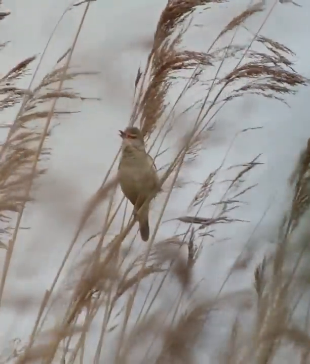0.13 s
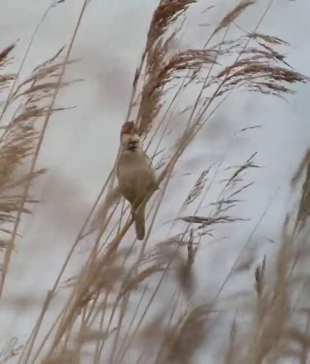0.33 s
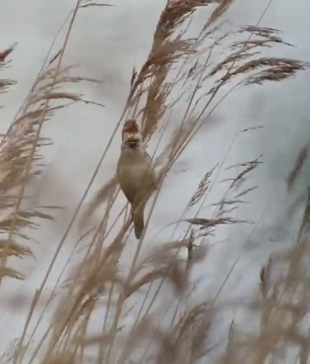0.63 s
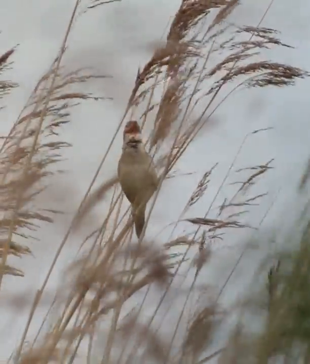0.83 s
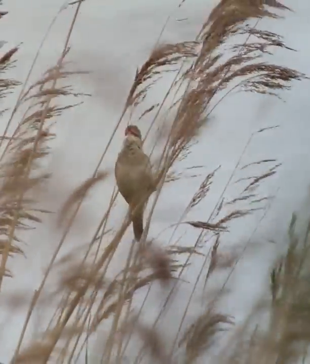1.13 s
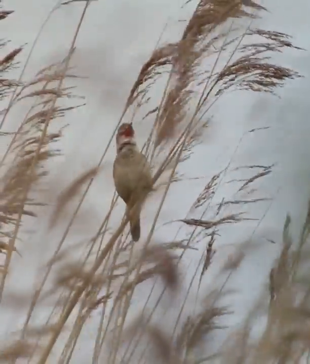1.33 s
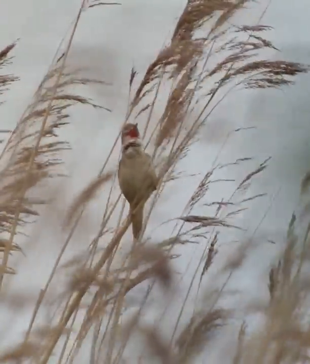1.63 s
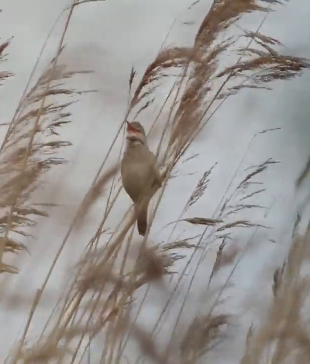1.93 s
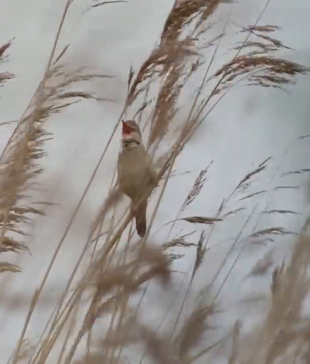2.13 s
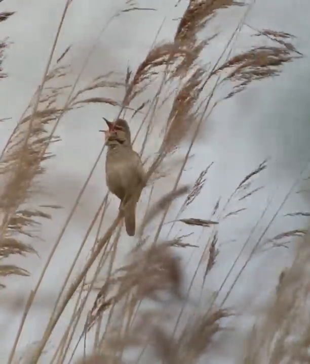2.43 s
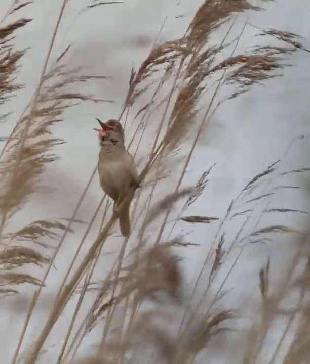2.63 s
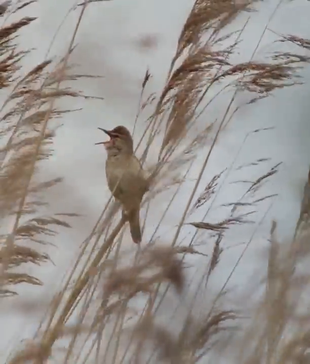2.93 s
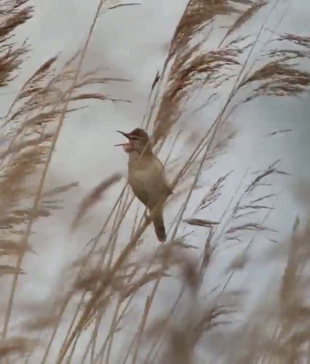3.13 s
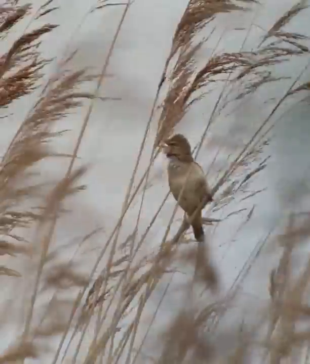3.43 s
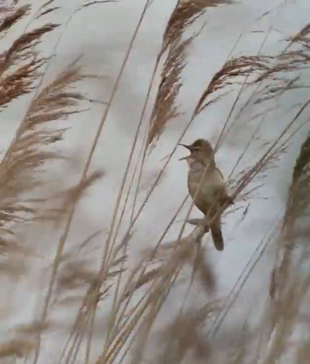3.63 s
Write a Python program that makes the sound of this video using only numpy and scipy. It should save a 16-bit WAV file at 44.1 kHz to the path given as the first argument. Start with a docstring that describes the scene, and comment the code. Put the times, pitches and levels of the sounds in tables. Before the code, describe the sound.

A warbler sings from reeds: quick falling yaps, a squeal, four rasping churrs, paired chacks, then rising slides into trills. Other birds whistle and pip. Distant stereo microphones, song to the left, soft wind rumble.

```python
"""A warbler sings harsh rhythmic phrases in a reed bed, left of distant microphones: nasal overtone stacks,
rasping pulses that ring the throat, fast trills and falling yaps, all tones and filtered pulses.
Other small birds whistle, buzz, seep and pip around it; reeds and bank scatter echoes as random taps.
Shaped noise makes the wind's rumble on the microphones, the hiss of the reeds, dull knocks and a stem tick."""
import sys
import numpy as np
from scipy import signal
from scipy.fft import rfft, irfft
from scipy.io import wavfile
from scipy.ndimage import uniform_filter1d

SR = 44100
rng = np.random.default_rng(int(sys.argv[2]) if len(sys.argv) > 2 else 0)


def makeup_ratio(level_db):
    """Linear amplitude ratio for a level in decibels (20 dB per factor of ten)."""
    decades = np.asarray(level_db, float) / 20
    return 10 ** decades


def wav_out(sig):
    """Save sig, one row per channel (or a flat mono array), as 16-bit PCM at SR to the path in sys.argv[1]."""
    wavfile.write(sys.argv[1], SR, np.round(np.clip(np.atleast_2d(sig).T, -1, 1) * 32767).astype(np.int16))


N = 166257

SINGER_PAN_DB, OTHERS_PAN_DB = 9, 9.5  # left over right
ATTACK_S, RELEASE_S = 0.0022, 0.004
THROB_JITTER = 0.06  # share of the throb rate


def evened(x):
    """Scales to an rms of 1."""
    return x / np.sqrt(np.mean(x ** 2) + 1e-20)


def read(points, hz):
    """Interpolates a curve along log frequency."""
    point_hz, value = np.transpose(points)
    return np.interp(np.log(hz + 1), np.log(point_hz + 1), value)


def add(mix, start_s, sound, pan_db):
    """Adds a mono sound, its level split between the sides; positive pan is left."""
    part = mix[:, round(start_s * SR):][:, :len(sound)]
    part += sound[:part.shape[1]] * makeup_ratio(np.array([[pan_db / 2], [-pan_db / 2]]))


def play(mix, table, voice, pan_db):
    """Plays each row of a table on one voice."""
    for start_s, *note in table:
        add(mix, start_s, voice(*note), pan_db)


def resonate(x, hz, width_hz):
    """A two-pole ring of gain about 1."""
    r = np.exp(-np.pi * width_hz / SR)
    angle = 2 * np.pi * hz / SR
    return signal.lfilter([1 - r * r], [1, -2 * r * np.cos(angle), r * r], x) * np.sin(angle)


def shape(length_s):
    """Time, share of the note gone and an attack-hold-release envelope."""
    t = np.arange(0, length_s + RELEASE_S, 1 / SR)
    gone = np.minimum(t / length_s, 1)
    env = np.clip(np.minimum(t / ATTACK_S, (t[-1] - t) / RELEASE_S), 0, 1)
    return t, gone, env


def drift(n, size):
    """Smoothed noise of rms about 1; a larger size wanders slower."""
    noise = uniform_filter1d(rng.standard_normal(8000), size)
    return evened(uniform_filter1d(noise, size))[:n]


def turns(hz):
    """Phase of a tone whose pitch wavers by 0.3 % rms."""
    return 2 * np.pi * np.cumsum(hz * (1 + 0.003 * drift(len(hz), size=60))) / SR


def throb_phase(n, rate_hz):
    """Phase of an uneven throb."""
    return 2 * np.pi * np.cumsum(rate_hz * (1 + THROB_JITTER * drift(n, size=250))) / SR


def nasal(length_s, hz, end_hz, level_db, tones_db, swell_db):
    """Overtone stack starting swell_db off its final level; pitch rises level off, falls steepen."""
    t, gone, env = shape(length_s)
    glide = np.sin(np.pi / 2 * gone) if end_hz > hz else gone ** 2
    phase = turns(hz + (end_hz - hz) * glide)
    stack = sum(makeup_ratio(tone_db + 1.87 * drift(len(t), size=200)) * np.sin(k * phase)
                for k, tone_db in enumerate(tones_db, 1))
    return makeup_ratio(level_db + swell_db * (1 - gone)) * env * evened(stack)


# nasal notes by kind: start_s, length_s, pitch_hz, end_pitch_hz, level_db
CHURRS = [(1.495, 0.073, 1128, 1186, -46), (1.756, 0.066, 1165, 1184, -40), (2.008, 0.045, 1142, 1188, -39),
          (2.283, 0.055, 1188, 1158, -41)]
CHACKS = [(2.517, 0.023, 1653, 1487, -45), (2.566, 0.037, 1664, 1567, -42),
          (2.7, 0.0245, 1645, 1550, -44.5), (2.75, 0.031, 1645, 1517, -40)]
SLIDES = [(3.012, 0.096, 1416, 1560, -50), (3.345, 0.13, 1453, 1564, -48), (3.695, 0.12, 1408, 1540, -54.5)]
SQUEAL = [(1.07, 0.083, 1437, 1666, -43.5)]
PEEP = [(1.175, 0.04, 1405, 1401, -43)]
# overtone balance by kind: relative_db of overtones 1, 2, ..
CHURR_TONES = [-34, -12, 3.5, -16]
CHACK_TONES = [-18, 0, -20.5]
SLIDE_TONES = [-18.5, -0.5, -4, -11]
SQUEAL_TONES = [-3, 13.5, 10, 7, -16]
PEEP_TONES = [-35, -13.5, -1.5, -19, -24, -33]


def nasal_notes(mix):
    """Warbler's voiced notes: one overtone balance and swell per kind."""
    for table, tones_db, swell_db in ((CHURRS, CHURR_TONES, -2), (CHACKS, CHACK_TONES, 0),
                                      (SLIDES, SLIDE_TONES, -11), (SQUEAL, SQUEAL_TONES, -16),
                                      (PEEP, PEEP_TONES, -3.5)):
        for start_s, *note in table:
            add(mix, start_s, nasal(*note, tones_db, swell_db), SINGER_PAN_DB)


# throat resonances: multiple of throat_hz, width_hz of each of two poled rings in series, gain_db
RASP_RINGS = [(0.652, 297, -3), (0.872, 556, 9.5), (1.068, 556, 12.5), (1.4, 764, -4.5), (1.751, 720, -6),
              (2.8, 1710, -14)]


def rasp(length_s, rate_hz, throat_hz, level_db):
    """Jittered pulses with breath noise ring the throat resonances."""
    jitter, breath, lowest_share = 0.07, 0.4, 0.63  # of rate, of pulse rms, of throat_hz
    t, gone, env = shape(length_s)
    cycle = np.cumsum(rate_hz * (1 + jitter * drift(len(t), size=40))) / SR
    pulses = np.diff(np.floor(cycle), prepend=0)
    pulses = pulses * makeup_ratio(rng.standard_normal(len(t)))  # 1 dB rms unevenness
    drive = evened(pulses) + breath * rng.standard_normal(len(t))
    drive = drive * env * makeup_ratio(-5 * gone ** 2)
    high_pass = signal.butter(4, lowest_share * throat_hz, "high", fs=SR, output="sos")
    drive = signal.sosfilt(high_pass, drive)
    rung = 0
    for multiple, width_hz, gain_db in RASP_RINGS:
        hz = multiple * throat_hz
        rung = rung + makeup_ratio(gain_db) * resonate(resonate(drive, hz, width_hz), hz, width_hz)
    return makeup_ratio(level_db) * evened(rung)


# rasps: start_s, length_s, pulse_rate_hz, throat_hz, level_db
RASPS = [(1.446, 0.029, 430, 3620, -50.5), (1.48, 0.059, 375, 3750, -45), (1.69, 0.03, 290, 3330, -47),
         (1.728, 0.039, 390, 3630, -42.5), (1.94, 0.021, 560, 3660, -48), (1.976, 0.039, 380, 3870, -41),
         (2.215, 0.02, 390, 3730, -41), (2.254, 0.048, 390, 3700, -40), (2.513, 0.019, 660, 3600, -52.5),
         (2.562, 0.026, 510, 3380, -48), (2.697, 0.023, 520, 3520, -47.5), (2.748, 0.016, 520, 3500, -45.5)]


def rasps(mix):
    """Warbler's pulse bursts."""
    play(mix, RASPS, rasp, SINGER_PAN_DB)


def trill(length_s, hz, end_hz, swing_hz, rate_hz, depth, level_db):
    """Pitch and level throb together, each loud part sweeping down; sweeps widen along the trill."""
    t, gone, env = shape(length_s)
    beat = throb_phase(len(t), rate_hz)
    grit = 1 + 0.4 * gone * drift(len(t), size=30)
    swing = swing_hz * (0.19 + 1.63 * gone) * np.sin(beat)
    phase = turns(hz + (end_hz - hz) * gone ** 5.66 + swing)
    level = makeup_ratio(level_db - 4.5 * (1 - gone) ** 3 - 11.7 * gone ** 5)
    tone = np.sin(phase) + 0.15 * np.sin(3 * phase / 2) + 0.02 * np.sin(phase / 2)
    return level * env * grit * (1 - depth * np.cos(beat)) * np.sqrt(2) * tone


# trills: start_s, length_s, pitch_hz, end_pitch_hz, swing_hz before widening, throb_rate_hz,
# throb_depth (0-1), level_db before the rise and fall
TRILLS = [(0, 0.034, 4295, 3920, 122, 140, .3, -43.5), (3.112, .112, 3260, 2875, 250, 72, 0.27, -42.5),
          (3.463, 0.075, 3345, 2780, 320, 74, 0.4, -44.5)]


def trills(mix):
    """Warbler's fast throbbing notes."""
    play(mix, TRILLS, trill, SINGER_PAN_DB)


# yaps: start_s, level_db before fade and flutter
YAPS = [(.266, -44), (0.288, -42), (0.308, -42)]
# swelling lead-in: start_s, length_s, pitch_hz, end_pitch_hz, level_db
LEAD_IN = [(.231, 0.0355, 3615, 4290, -41.5)]


def yaps(mix):
    """Warbler's quick falling notes, rising tones reversed in time, after a lead-in tone."""
    length_s, start_hz, end_hz = 0.016, 5050, 4140
    for start_s, *note in LEAD_IN:
        add(mix, start_s, nasal(*note, tones_db=[0], swell_db=-0.5), SINGER_PAN_DB)
    for start_s, level_db in YAPS:
        fall = whistle(length_s, end_hz, start_hz, 3.8, level_db)[::-1]
        add(mix, start_s, fall, SINGER_PAN_DB)


def whistle(length_s, hz, end_hz, glide_share, level_db):
    """One wavering, fading tone that glides, then holds."""
    rise_s, fade_db, tremble = 0.006, -5, 0.009  # tremble: share of pitch
    t, gone, env = shape(length_s)
    glide = np.sin(np.pi / 2 * np.minimum(gone / glide_share, 1))
    glide = glide / np.sin(np.pi / 2 * min(1 / glide_share, 1))
    pitch_hz = (hz + (end_hz - hz) * glide) * (1 + tremble * drift(len(t), size=25))
    level = makeup_ratio(level_db + fade_db * gone + 4.9 * drift(len(t), size=90))
    return level * env * np.minimum(t / rise_s, 1) * np.sqrt(2) * np.sin(turns(pitch_hz))


# whistles: start_s, length_s, pitch_hz, end_pitch_hz, glide_share of the note (over 1: still gliding
# at the end), level_db before fade and flutter
WHISTLES = [(0.091, 0.11, 5210, 5170, 0.78, -63), (.215, 0.064, 5050, 4980, 1.1, -56.5),
            (.33, 0.034, 4170, 4005, 1.7, -46), (0.484, 0.02, 3590, 4370, .6, -47),
            (.544, 0.027, 4230, 3800, 1.8, -46), (0.577, 0.032, 3700, 4320, 0.84, -45),
            (.668, 0.051, 3140, 4370, 0.86, -49.5), (.686, 0.025, 3830, 3250, 2.5, -45),
            (1.293, 0.11, 3520, 3610, 0.61, -56.5), (1.437, 0.076, 5300, 3780, 1.7, -55),
            (1.588, 0.092, 2700, 3110, 0.63, -59.5), (1.853, 0.016, 4390, 6140, 1.9, -49),
            (1.861, 0.029, 4600, 6400, 0.98, -52), (1.886, 0.076, 4550, 4275, 3, -43.5),
            (1.923, .03, 7740, 7720, 1, -58.5), (1.917, 0.059, 6900, 6300, 1.1, -54),
            (2.238, 0.0062, 3060, 3100, 0.67, -39), (2.994, 0.16, 5030, 4710, 0.68, -63),
            (3.005, 0.03, 3420, 4520, 1.7, -54), (3.332, 0.02, 3470, 4370, 0.74, -56)]


def whistles(mix):
    """Near-pure tones of other birds."""
    play(mix, WHISTLES, whistle, OTHERS_PAN_DB)


def buzz(length_s, hz, end_hz, rate_hz, level_db):
    """A falling tone with a fast uneven throb, partly dissolved into noise around its pitch."""
    swing_hz, blur_hz, noise_share = 140, 220, 0.7
    t, gone, env = shape(length_s)
    beat = throb_phase(len(t), rate_hz)
    phase = turns(hz + (end_hz - hz) * np.sin(np.pi / 2 * gone) + swing_hz * np.sin(beat))
    size = round(SR / (2 * blur_hz))
    p, q = drift(len(t), size), drift(len(t), size)
    tone = ((1 - noise_share) * 2 + noise_share * p) * np.sin(phase) + noise_share * q * np.cos(phase)
    arch = np.sin(np.pi * (0.15 + 0.71 * gone))
    return makeup_ratio(level_db) * env * evened(tone * (1 - 0.18 * np.cos(beat)) * arch)


# scratchy buzzes of a farther bird: start_s, length_s, pitch_hz, end_pitch_hz, throb_rate_hz, level_db
BUZZES = [(.445, 0.083, 5000, 4770, 124, -53.5), (.542, 0.069, 5200, 4890, 115, -51),
          (.65, 0.0675, 5110, 4770, 150, -53.5), (.945, 0.14, 3840, 2840, 75, -56.5)]
# thin high bird: same columns
SEEPS = [(1.6, 0.07, 8280, 7820, 122, -55.5), (1.74, 0.105, 8430, 7480, 122, -55.5)]


def buzzes_and_seeps(mix):
    """Blurred throbbing tones of two birds, the high one less far left."""
    play(mix, BUZZES, buzz, OTHERS_PAN_DB)
    play(mix, SEEPS, buzz, pan_db=5.5)


# pips: start_s of the tick, pitch_hz, level_db of the tone at its end
PIPS = [(0.438, 2470, -55.5), (0.512, 2627, -46), (0.632, 2648, -45), (0.715, 2665, -42), (.831, 2687, -45),
        (0.912, 2744, -42)]


def pips(mix):
    """A pulsed tick, then a short, slightly falling and fading tone."""
    delay_s, length_s, tick_s, tick_db, pan_db = 0.005, 0.029, 0.0045, -3.5, 5
    for start_s, hz, level_db in PIPS:
        tone = nasal(length_s, hz, hz * 0.96, level_db, tones_db=[0], swell_db=1.5)
        add(mix, start_s + delay_s, tone, pan_db)
        add(mix, start_s, rasp(tick_s, 500, 1.085 * hz, level_db + tick_db), pan_db)


def birds():
    """All notes placed in time and direction; the right microphone hears them later."""
    right_lag_s = 0.0003914
    mix = np.zeros((2, N))
    for voice in (nasal_notes, rasps, trills, yaps, whistles, buzzes_and_seeps, pips):
        voice(mix)
    lag = np.exp(-2j * np.pi * np.fft.rfftfreq(2 * N, 1 / SR) * right_lag_s)
    late = irfft(rfft(mix[1], 2 * N) * lag)[:N]
    return np.array([mix[0], late])


def echoes(song):
    """Sparse random taps: close reeds die fast, the far bank slowly."""
    far_t60_s, near_t60_s, far_db, near_db = 0.75, 0.25, -11, -12
    same_side = 0.96  # share of the song feeding the echo on its own side
    t = np.arange(SR) / SR
    taps = rng.choice([-1., 1.], (2, SR)) * (rng.random((2, SR)) < 0.04) * (t > 0.003)
    far, near = taps * makeup_ratio(-60 * t / far_t60_s), taps * makeup_ratio(-60 * t / near_t60_s)
    tail = makeup_ratio(far_db) * far / np.linalg.norm(far[0])
    tail = tail + makeup_ratio(near_db) * near / np.linalg.norm(near[0])
    sent = same_side * song + (1 - same_side) * song[::-1]
    return signal.fftconvolve(sent, tail, axes=1)[:, :N]


# dull knocks: start_s, level_db, ring_hz
KNOCKS = [(2.916, -52, 890), (3.408, -55, 380)]
# dry stem ticks: start_s, level_db
STEM_TICKS = [(3.316, -61.5)]


def knocks_and_ticks():
    """Short soft noise puffs: low ones ring a dull body, high ones are dry stems."""
    out, t = np.zeros((2, N)), np.arange(1300) / SR
    puff = t * np.exp(-t / 0.0025)
    hits = [(s, db, hz, 1.7 * hz) for s, db, hz in KNOCKS]
    hits += [(s, db, 8400, 4000) for s, db in STEM_TICKS]
    for start_s, level_db, hz, width_hz in hits:
        ring = resonate(rng.standard_normal(len(t)) * puff, hz, width_hz)
        add(out, start_s, makeup_ratio(level_db) * evened(ring), pan_db=3.0)
    return out


# left-right likeness of the air noises: freq_hz, likeness (-1 to 1)
LIKENESS = [(60, 1), (240, 0.92), (930, 0.27), (3670, -0.22), (14400, 0.099)]


def air(spectrum, patchy_db, flicker_db, size):
    """Noise of a given colour with drifting patches and wide flicker."""
    frames, hz = N // (size // 4) + 5, np.fft.rfftfreq(size, 1 / SR)
    a, b, c, d, patches = rng.standard_normal((frames, len(hz), 5)).T
    patches = uniform_filter1d(patches, size // 64, 0)  # over frequency
    patches = evened(uniform_filter1d(patches, 16384 // size, 1))  # over time
    flicker = evened(uniform_filter1d(rng.standard_normal(frames), 4))
    same = np.clip(read(LIKENESS, hz), -1, 1)[:, None]
    left = a + 1j * b
    right = same * left + np.sqrt(1 - same ** 2) * (c + 1j * d)
    gain_db = read(spectrum, hz)[:, None] + patchy_db * patches + flicker_db * flicker
    z = np.array([left, right]) * makeup_ratio(gain_db)
    return evened(signal.istft(z, nperseg=size, noverlap=size * 3 // 4)[1][:, :N])


# reeds in gusts: time_s, fizz_db, rustle_db
RUSTLE = [(0, -62.5, -59.5), (.2, -99, -62.5), (.33, -79, -55), (.55, -68, -61.5), (.79, -81, -75),
          (1.35, -77, -74), (1.5, -99, -67), (2.3, -87, -58.5), (2.7, -72, -66), (2.878, -68, -52.5),
          (3.05, -71.5, -61.5), (3.38, -68, -51), (3.55, -71, -59.5), (3.77, -73.5, -59)]
# colour of the high fizz: freq_hz, relative density_db per Hz
FIZZ = [(7000, -49), (9500, 12), (12000, 20.5), (15000, -13)]
# colour of the broad rustle: freq_hz, relative density_db per Hz
REEDS = [(150, -1), (400, 7.5), (1200, -2.5), (2200, -0.5), (7000, 3), (9000, -5), (12000, -11)]


def reeds():
    """High fizz and broad rustle, two noises whose levels follow the gusts."""
    t = np.arange(N) / SR
    time_s, fizz_db, rustle_db = np.transpose(RUSTLE)
    fizz = air(FIZZ, patchy_db=1.0, flicker_db=1.0, size=512)
    rustle = air(REEDS, patchy_db=3.5, flicker_db=1.0, size=512)
    return makeup_ratio(np.interp(t, time_s, fizz_db)) * fizz + makeup_ratio(np.interp(t, time_s, rustle_db)) * rustle


# wind rumble and far marsh hiss: freq_hz, relative density_db per Hz
FLOOR = [(22, -43), (36, -11.5), (60, 6), (85, -1.5), (199, -14), (355, -16), (1270, -35), (1980, -34.5),
         (3630, -22), (4920, -28.5), (7050, -25.5), (9300, -47.5), (11300, -90), (14900, -75)]


def wind():
    """Steady low-heavy noise, leaning slightly left."""
    level_db, lean_db = -50, 1.0
    noise = air(FLOOR, patchy_db=1.0, flicker_db=0.9, size=4096)
    return makeup_ratio(level_db) * noise * makeup_ratio(np.array([[lean_db / 2], [-lean_db / 2]]))


def scene():
    """Birds and their echoes over wind, reeds and knocks."""
    song = birds()
    return song + echoes(song) + knocks_and_ticks() + reeds() + wind()


def roll_off(x):
    """The treble ends steeply here."""
    return signal.sosfilt(signal.butter(12, 14700, fs=SR, output="sos"), x)


def record(dry):
    """Turns the finished mix into the output."""
    return roll_off(dry)


dry = scene()
out = record(dry)
wav_out(out)
```